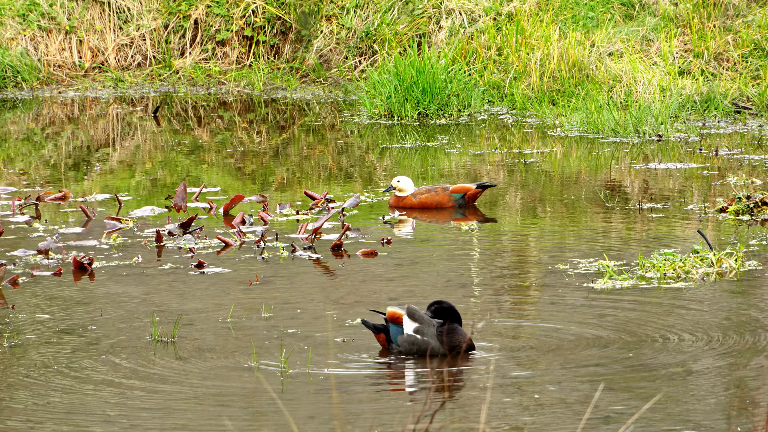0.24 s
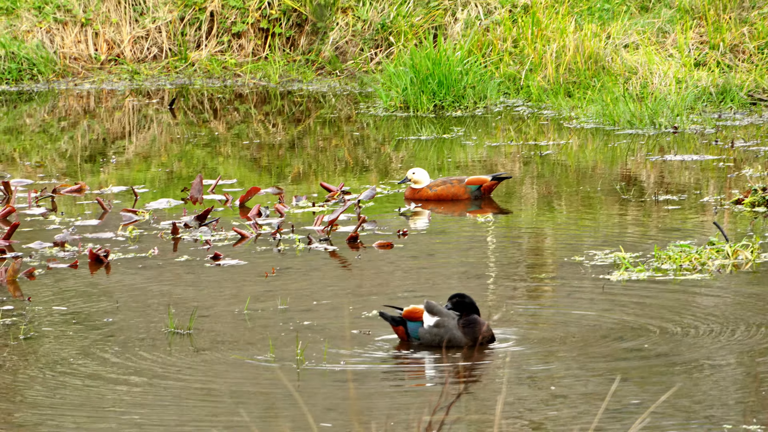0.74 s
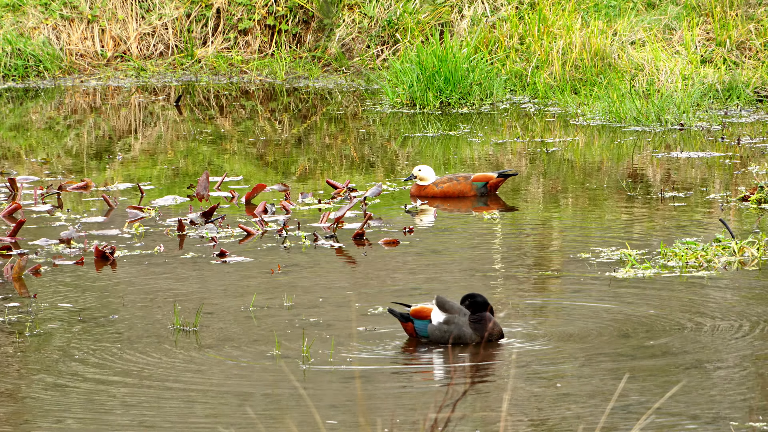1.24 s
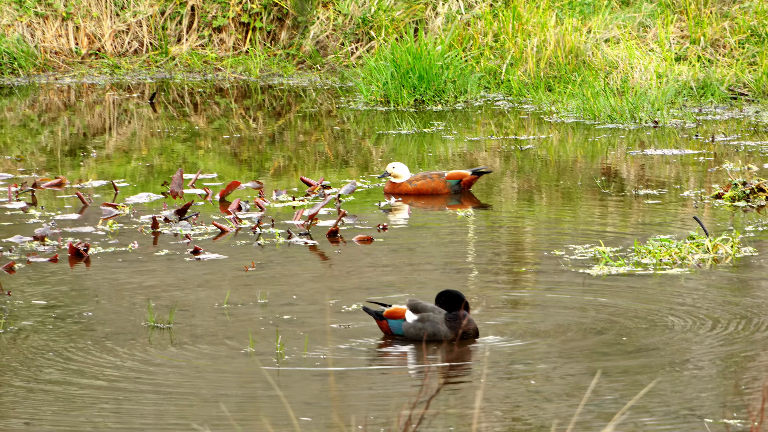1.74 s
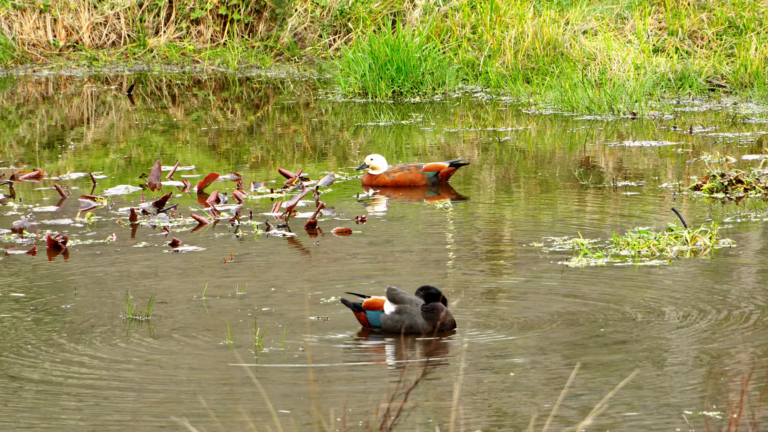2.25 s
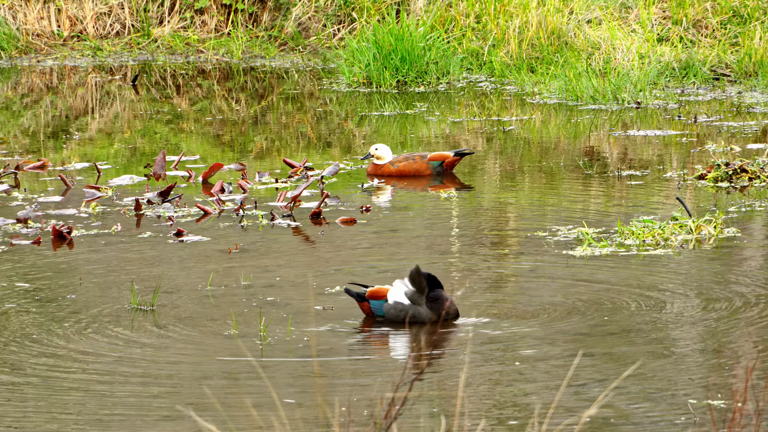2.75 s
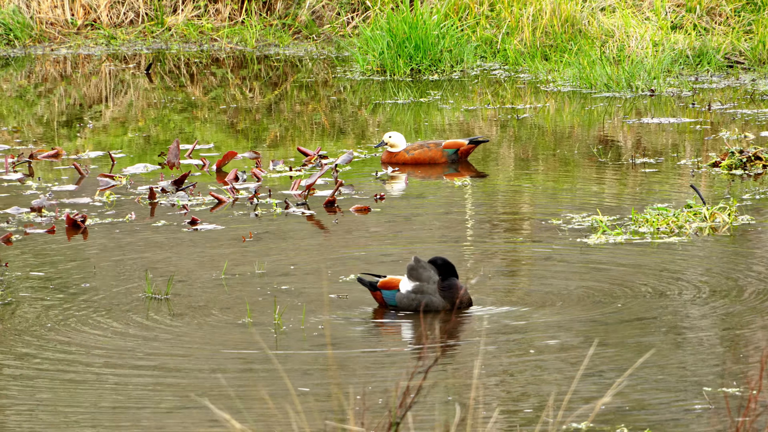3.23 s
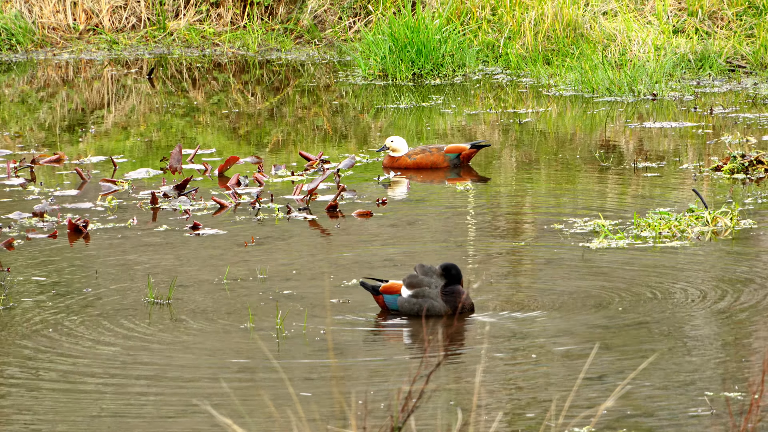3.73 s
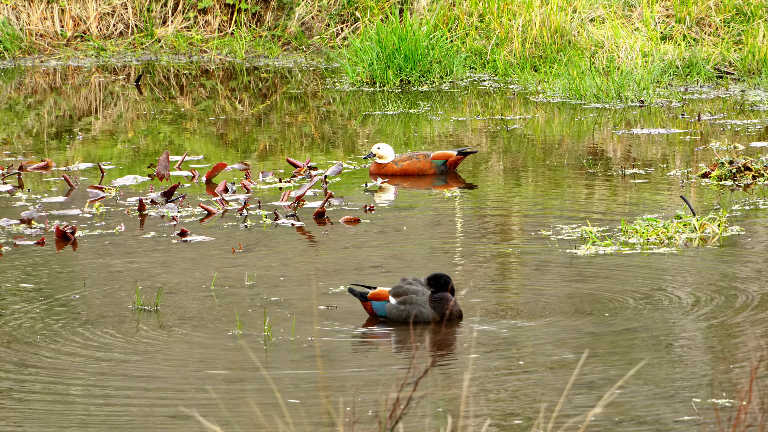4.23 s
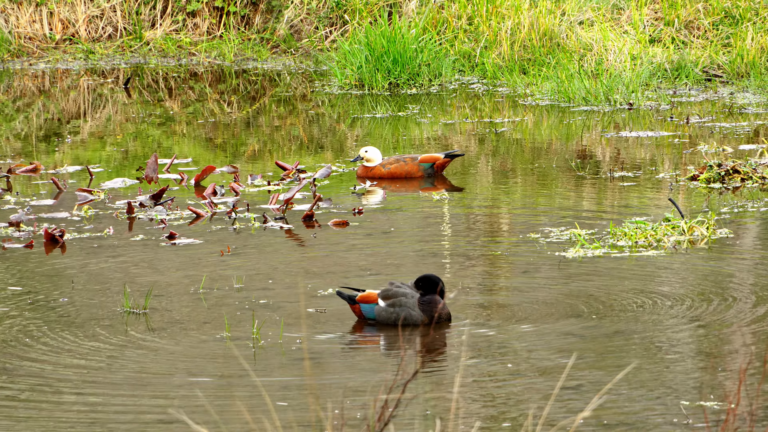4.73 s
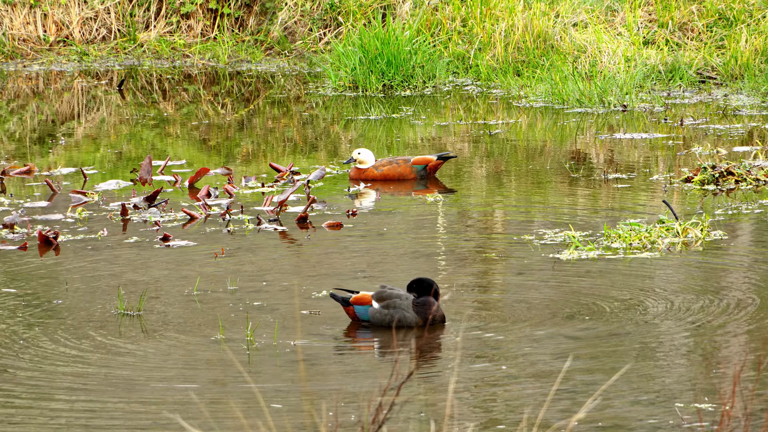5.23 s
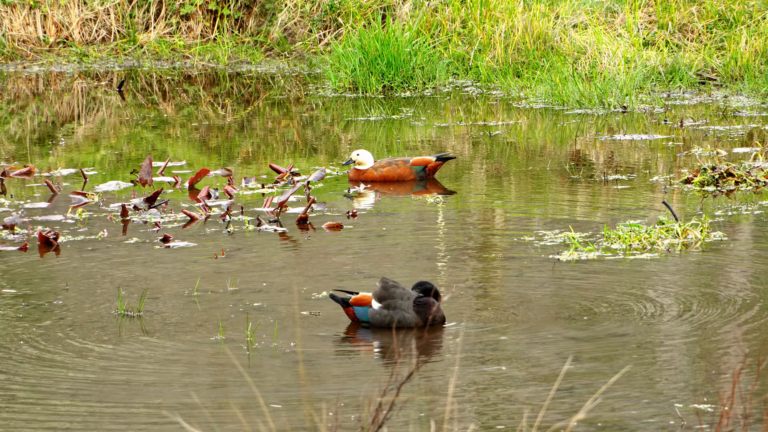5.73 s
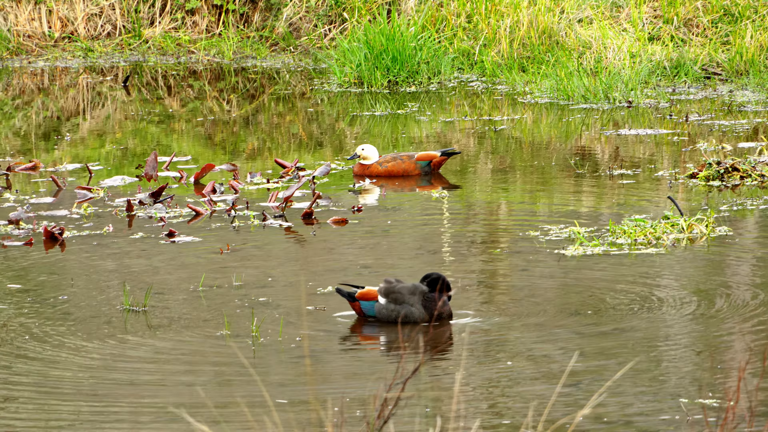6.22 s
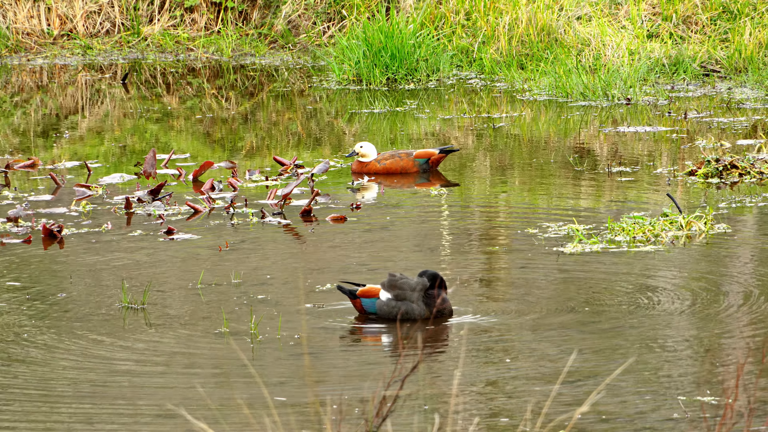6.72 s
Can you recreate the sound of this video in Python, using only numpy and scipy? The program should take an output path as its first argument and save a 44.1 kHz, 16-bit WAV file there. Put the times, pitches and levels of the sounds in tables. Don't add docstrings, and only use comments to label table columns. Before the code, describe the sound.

A quiet pond outdoors, with faint hum, steady hiss and soft low wind bumps. A brief clear whistle comes first, then faint distant warbling. Midway, a nearby bird gives a loud rising slur and rough buzzes. Varied whistles and quick chirps follow, and the rasping phrase returns at the end. A small stereo microphone catches light echoes from banks and trees; the ducks are silent.

```python
import sys
import numpy as np
from scipy import signal
from scipy.fft import rfft, irfft, next_fast_len
from scipy.io import wavfile
from scipy.ndimage import uniform_filter1d, minimum_filter1d

SR = 44100
rng = np.random.default_rng(int(sys.argv[2]) if len(sys.argv) > 2 else 0)


def file_out(sig):
    cols = np.atleast_2d(sig).T
    lim = np.clip(cols, -1, 1)
    pcm = np.round(lim * 32767).astype(np.int16)
    wavfile.write(sys.argv[1], SR, pcm)


def gain_from_db(level_db):
    decades = np.asarray(level_db, float) / 20
    return 10 ** decades


N = 307377

# start in seconds, length in seconds,
# share of the length where it peaks, peak level in dB, pitch in Hz.
PIPER_WHISTLES = [ (1.745, 0.066, 0.39, -36, 2970), (1.869, 0.11, .2, -54, 2957),
                  (4.203, 0.055, 0.67, -56, 2284), (4.8, .045, 0.51, -53, 3105),
                  (4.988, .042, 0.5, -35, 2997), (5.043, .047, .2, -37.5, 3012),
                  (5.074, 0.07, 0.78, -32.5, 3288), (5.183, 0.099, 0.45, -35.5, 2513),
                  (5.258, 0.072, 0.5, -31, 1670), (5.347, 0.099, 0.22, -54.5, 1275),
                  (5.455, 0.055, 0.51, -33, 1660), (5.508, .046, 0.74, -27.5, 1638),
                  (5.753, 0.087, 0.52, -42, 2602), (6.088, 0.048, 0.23, -37, 1558),
                  (6.128, 0.078, 0.23, -34, 1552), (6.158, 0.088, 0.24, -53, 948),
                  (6.331, 0.077, .45, -53, 947)]
# start in
# seconds, length in seconds, peak level in dB, first pitch in Hz, last pitch in Hz.
RISING_WHISTLES = [
    (4.063, 0.059, -52.5, 2970, 3200),
    (4.173, 0.049, -53.5, 1477, 1610),
    (5.656, 0.088, -43.5, 4980, 5115),
    (6.041, .055, -51, 1483, 1520),
    (6.849, 0.07, -41, 1370, 1453),
]
# start in seconds, number of throbs, throb rate in Hz, depth from 0 to 1.
PIPER_THROBS = [
    (6.142, 4, 55.7, 0.84),
    (6.855, 7, 130, 0.6),
]
# time in seconds, left over right in dB.
PIPER_HEAD = [(1.76, -8), (1.9, -11), (4.1, -2), (4.22, -15), (4.99, 3), (5.07, -2), (5.22, -9), (5.3, -3),
              (5.47, -4), (5.54, 1), (6.12, 2.5), (6.9, -4)]

# seconds after the start, pitch in Hz, level in dB,
# second partial in dB, third partial in dB.
RASPER_SLUR = [(-.03, 3360, -46, -40, -42), (-.002, 3357, -28.5, -40, -40), (.012, 3365, -4.5, -35, -39),
               (.04, 3587, -0.5, -32, -26), (.06, 4140, -1, -36, -25), (.079, 4980, -3, -28, -29)]
# start in seconds, level in dB.
RASPER_SLUR_TIMES = [
    (3.362, -27),
    (6.338, -27),
]
# buzz rate in Hz, depth from 0 to 1, pitch wobble as a share.
RASPER_SLUR_BUZZ = (185, 0.1, .013)
# syllable name, start in seconds, length in seconds, peak level in dB.
RASPER_NOTES = [("seep", 3.447, 0.108, -46), ("rattle", 3.512, .085, -33.5), ("rasp", 3.648, .066, -30.5),
                ("crest", 3.725, .09, -33), ("seep", 6.422, 0.065, -46), ("zee", 6.485, .05, -51),
                ("rattle", 6.49, 0.11, -36.5), ("rasp", 6.632, .078, -33.5), ("crest", 6.725, .08, -36),
                ("rasp", 6.856, .07, -33), ("rattle", 6.93, .06, -34)]
RASPER_SYLLABLES = {"seep": (8462, 8349, 0.4, -45, -45), "zee": (6537, 6397, .15, -40, -45),
                    "rattle": (5149.5, 5150, 1, -16.5, -18), "rasp": (4800, 5350, .38, -11, -18),
                    "crest": (5231.5, 5947, .6, -15.5, -40)}
RASPER_BUZZES = {"seep": (220, .33, 0.018), "zee": (153, .6, .012), "rattle": (82, 0.84, 0.03),
                 "rasp": (190, 0.48, 0.0357), "crest": (85, 0.92, 0.0304)}
# frequency in Hz, level in dB.
RASPER_THROAT = [(3300, 0), (4600, -6), (5700, 1.5), (6900, -5), (8400, -4.5), (10000, 1), (12500, -5),
                 (14300, 4), (15700, -4)]

# start in seconds, length in seconds, peak level in dB,
# first pitch in Hz, last pitch in Hz.
WARBLER_SLURS = [ (2.03, 0.25, -63.5, 2530, 2080), (1.97, 0.21, -67, 2950, 2660),
                 (2.15, 0.14, -61.5, 2640, 2406), (2.28, 0.14, -59.5, 2444, 2003),
                 (2.289, 0.12, -54, 2435, 2466), (2.41, .045, -60, 2940, 2920),
                 (2.43, 0.088, -56, 2630, 2480), (2.489, 0.023, -51, 3100, 3125),
                 (2.57, .1, -58.5, 2480, 2404), (2.66, .2, -55.5, 2480, 2552),
                 (2.86, 0.17, -61, 2520, 2440), (2.3, .28, -61, 2790, 3035), (2.65, .25, -67, 2890, 2740),
                 (4.45, 0.14, -63, 3100, 2880), (4.68, 0.12, -63, 2830, 2775),
                 (4.27, .2, -66.5, 2320, 2290), (4.52, .09, -58.5, 2540, 2195),
                 (4.618, 0.13, -58, 2328, 2157), (4.68, .15, -62, 2530, 2356),
                 (4.822, 0.17, -59.5, 2343, 2277), (5.35, .2, -61, 2540, 2470),
                 (5.549, 0.17, -55.5, 2600, 2560)]
# start in seconds, length in
# seconds, peak level in dB, first pitch in Hz, last pitch in Hz.
THIN_SLURS = [
    (1.5, 0.3, -72, 8040, 7700),
    (2.53, .34, -58, 8750, 6400),
    (5.62, .3, -63.5, 8440, 6200),
    (5.7, .08, -70, 6860, 6200),
    (5.72, 0.103, -63, 5160, 5300),
    (5.17, 0.065, -58.5, 1384, 1413),
]
# start in seconds, length in seconds, peak level in dB, first pitch in Hz, last pitch in Hz.
CHIRP_SLURS = [
    (5.03, 0.05, -49, 1690, 1590),
    (5.835, .037, -36, 2566, 1383),
    (6.258, 0.022, -49.5, 2560, 2350),
    (6.278, .034, -47, 1903, 1334),
    (6.608, .047, -39, 2653, 1254),
    (6.66, 0.03, -40, 2382, 1260),
    (6.708, .029, -44, 2293, 1256),
    (6.75, 0.021, -40.5, 2335, 1173),
]
# start in seconds, length in seconds, peak level in dB,
# first pitch in Hz, last pitch in Hz.
CHACK_SLURS = [
    (1.872, .035, -51, 2790, 1500),
    (4.205, .025, -54, 2987, 1845),
    (5.12, .035, -46.5, 2584, 1505),
]
# time in seconds, level in dB.
FLOCK_LEVEL = [
    (1.8, -73),
    (2.2, -58.5),
    (2.7, -55),
    (3.1, -70),
    (4.3, -70),
    (4.9, -56),
    (5.2, -58),
    (5.6, -54.5),
    (5.9, -57.5),
    (6.3, -82),
]

# frequency in Hz, left over right in dB, lead of the left port in radians.
PIPER_DIRECTION = [(1300, -3, -0.22), (1690, -1, -0.9), (3200, -0.5, -1.48), (5100, 1.5, -1.3)]
RASPER_DIRECTION = [(3460, -6.5, -2.5), (5040, 0, -3), (7400, -2, -6), (10900, -2.5, -4),
                    (15000, -14, -4.5)]
WARBLER_DIRECTION = [(2080, -19, -1.9), (2500, -11.5, -1.77), (3100, -4.5, -1.65)]
THIN_DIRECTION = [(6600, 1.5, 1.6), (8500, 1.5, 1.8)]
CHIRP_DIRECTION = [(1310, -1.9, 0.23), (2480, -2.2, -1.4)]
# frequency in Hz, time to fade by 60 dB in seconds.
BANK_ECHO = [(1000, 0.83), (2000, 0.85), (3500, 0.67), (6000, 0.62), (12000, 0.99)]

# frequency in Hz, level in dB per Hz.
GUST_COLOUR = [(8.8, -34), (15, -1), (73, -5), (119, -17), (174, -12), (236, -25), (250, -40), (320, -70),
               (550, -120)]
# time in seconds, level in dB.
BREEZE_LEVEL = [(0, -97), (.5, -88), (1.2, -99), (1.6, -92), (3.55, -89), (3.75, -100), (5.1, -91.5),
                (6.97, -92)]
# time in seconds, peak level in dB.
WIND_PUFFS = [
    (.58, -73),
    (.97, -90),
    (1.42, -75),
    (2.89, -66),
    (5.1, -84),
    (5.8, -81),
    (6.56, -89),
]

# frequency in Hz, level in dB per Hz.
HUM_COLOUR = [(60, -48), (120, -25.5), (200, -11.5), (310, -5), (500, -.5), (650, 1), (800, -3.5),
              (1200, -5), (2000, -4), (3200, -6.5), (4200, -10), (6300, -13.5), (8000, -14.5), (10500, -11),
              (15700, -9.5)]
# time in seconds, hum swell in dB, hiss swell in dB.
HUM_SWELL = [(0, 0.8, 1), (.5, 1.7, 0.4), (1.2, 0.45, -0.5), (2.5, 1.24, 0), (6, 1.35, 0), (7, 1.8, 2)]
# frequency in Hz, likeness from 0 to 1.
HUM_LIKENESS = [(60, 0.96), (240, 0.79), (950, 0.2), (3770, 0.095), (15000, 0.071)]
# frequency in Hz, left over right in dB.
HUM_LEAN = [(60, 5), (180, -1.5), (550, 0.5), (1650, 0.0), (4970, -0.5), (15000, -5)]


def piper():
    song = np.zeros((2, N))
    t = np.arange(N) / SR
    rise_db_per_s, fall_db, sag = 330, 7.5, 0.99
    whistles = []
    for start, length, peak, db, hz in PIPER_WHISTLES:
        rise_db = rise_db_per_s * peak * length
        whistles.append(arch(start, length, db, hz / sag, hz * sag, peak, rise_db, fall_db))
    for slur in RISING_WHISTLES:
        whistles.append(arch(*slur, peak=0.63, rise_db=24, fall_db=10))
    for rows in whistles:
        turn_db = np.interp(rows[:, 0].mean(), *np.transpose(PIPER_HEAD))
        sides = np.sqrt(2 / (1 + gain_from_db([-2 * turn_db, 2 * turn_db])))
        s, sound = note(rows, wobble=0.0017, flutter_db=0.9, edge=0.0044)
        add(song.T, s, sound[:, None] * sides)
    for start, throbs, throb_hz, depth in PIPER_THROBS:
        turns = np.clip(throb_hz * (t - start), 0, round(throbs))
        song *= 1 - depth * np.sin(np.pi * turns) ** 2
    return place(gain_from_db(-1.1) * song, PIPER_DIRECTION, wet_db=-8, sway=1.7)


def rasper():
    song = np.zeros(N)
    effort_db, brighten = -31.5, 0.72
    for start, db in RASPER_SLUR_TIMES:
        rows = np.add(RASPER_SLUR, [start, 0, db, 0, 0])
        add(song, *note(rows, *RASPER_SLUR_BUZZ, flutter_db=1.5))
    for name, start, length, db in RASPER_NOTES:
        from_hz, to_hz, peak, *partials_db = RASPER_SYLLABLES[name]
        rows = arch(start, length, db, from_hz, to_hz, peak, rise_db=11, fall_db=8)
        partials_db = np.add(partials_db, brighten * (db - effort_db))
        rows = np.hstack([rows, np.tile(partials_db, (len(rows), 1))])
        add(song, *note(rows, *RASPER_BUZZES[name], flutter_db=1.5))
    size = next_fast_len(N, real=True)
    throat = gain_from_db(read(RASPER_THROAT, np.fft.rfftfreq(size, 1 / SR)))
    song = irfft(rfft(song, size) * throat, size)[:N]
    return place(gain_from_db(-0.66) * song, RASPER_DIRECTION, wet_db=-.4)


def warbler():
    song = gain_from_db(-0.5) * flock()
    for slur in WARBLER_SLURS:
        rows = arch(*slur, peak=0.47, rise_db=5, fall_db=3.5)
        add(song, *note(rows, buzz_hz=30.6, depth=0.55, wobble=0.011, flutter_db=1.5))
    return place(gain_from_db(-2.5) * song, WARBLER_DIRECTION, wet_db=-3.0)


def thin_whistler():
    song = np.zeros(N)
    for slur in THIN_SLURS:
        rows = arch(*slur, peak=0.85, rise_db=9.5, fall_db=14)
        add(song, *note(rows, buzz_hz=60, depth=0.47, wobble=0.0098, flutter_db=1.0))
    return place(gain_from_db(-0.5) * song, THIN_DIRECTION, wet_db=0.0)


def chirps():
    song = np.zeros(N)
    for slurs, wobble in ((CHIRP_SLURS, .03), (CHACK_SLURS, .13)):
        for slur in slurs:
            rows = arch(*slur, peak=0.4, rise_db=7, fall_db=17.5, ease=.85)
            add(song, *note(rows, buzz_hz=156.5, depth=0.43, wobble=wobble, flutter_db=2.0, edge=0.0023))
    return place(gain_from_db(-2.2) * song, CHIRP_DIRECTION, wet_db=0.4)


def flock():
    song = np.zeros(N)
    for when, pitch, glide, size in rng.random((420, 4)):
        start = 7 * when
        end = start + 0.0509 + 0.0805 * size
        hz, db = 2000 + 1350 * pitch ** .8, 3.3 * size
        rows = [(start, hz, db), (end, hz * (.8 + .2 * glide), db)]
        add(song, *note(rows, wobble=0.035, edge=0.023))
    level_db = np.interp(np.arange(N) / SR, *np.transpose(FLOCK_LEVEL))
    return evened(song) * gain_from_db(level_db)


def arch(start, length, db, from_hz, to_hz, peak, rise_db, fall_db, ease=1.):
    u = np.arange(13) / 12
    peak = np.clip(peak, .05, .95)
    rise = rise_db * (1 - u / peak) ** 2
    fall = fall_db * ((u - peak) / (1 - peak)) ** 2
    level_db = db - np.where(u < peak, rise, fall)
    return np.transpose([start + length * u, from_hz * (to_hz / from_hz) ** u ** ease, level_db])


def note(rows, buzz_hz=100, depth=0., wobble=.003, flutter_db=0.5, edge=0.0043):
    s, *columns = np.transpose(rows)
    t = np.arange(s[0], s[-1], 1 / SR)
    hz, db, *partials_db = (uniform_filter1d(np.interp(t, s, c), size=300, mode="nearest") for c in columns)
    beats = 2 * np.pi * np.cumsum(buzz_hz * (1 + 0.143 * wander(len(t), 39.7))) / SR
    bend = wander(len(t), 351.4) + 1.28 * depth * np.sin(beats)
    turns = 2 * np.pi * np.cumsum(hz * (1 + wobble * bend)) / SR
    overtones = sum(gain_from_db(p) * np.sin(k * turns) for k, p in enumerate(partials_db, 2))
    tone = np.sin(turns) + (0.47 + 0.72 * wander(len(t), 700)) * overtones
    chop = 1 - np.clip(depth, 0, 1) * (.5 + .5 * np.cos(beats)) ** 1.4
    edges = np.clip(np.minimum(t - s[0], s[-1] - t) / edge, 0, 1)
    level = np.sqrt(2) * gain_from_db(db + flutter_db * wander(len(t), 85))
    return s[0], level * tone * evened(chop) * edges


def place(x, direction, wet_db, sway=0.42):
    size = next_fast_len(N + SR, real=True)
    hz = np.fft.rfftfreq(size, 1 / SR)
    half = gain_from_db(read(direction, hz) / 2) * np.exp(.5j * read(direction, hz, axis=2))
    ports = np.array([half, 1 / half]) / np.sqrt((abs(half) ** 2 + abs(half) ** -2) / 2)
    taps = np.zeros((2, SR))
    at = np.arange(200, SR - 20, 20)
    at = at + rng.integers(0, 20, (2, len(at)))
    np.put_along_axis(taps, at, rng.choice([-1, 1], at.shape), axis=1)
    hz, t, z = signal.stft(taps + 0.27 * taps[::-1], SR, nperseg=256)
    far = gain_from_db(-60 * t / read(BANK_ECHO, hz)[:, None])
    near = 0.42 * gain_from_db(-60 * t / 0.21)
    tail = signal.istft(z * (far + near), SR, nperseg=256)[1][:, :SR]
    tail *= gain_from_db(wet_db) / np.linalg.norm(tail[0])
    shaken = x.reshape(-1, N).mean(0) * (1 + sway * wander(N, 49)) / np.sqrt(1 + sway ** 2)
    direct = rfft(x, size) * ports
    echo = rfft(shaken, size) * rfft(tail, size) * ports ** 0.55
    return irfft(direct + echo, size)[:, :N]


def add(mix, s, sound):
    part = mix[round(s * SR):][:len(sound)]
    part += sound[:len(part)]


def wander(size, hz):
    steps = rng.standard_normal(int(2 * hz * size / SR) + 3)
    return 1.198 * np.interp(np.arange(size) * 2 * hz / SR, np.arange(len(steps)), steps)


def evened(x):
    return x / np.sqrt(np.mean(x ** 2) + 1e-20)


def read(points, hz, axis=1):
    table = np.transpose(points)
    return np.interp(np.log(hz + 1), np.log(table[0] + 1), table[axis])


def wind():
    size = next_fast_len(N, real=True)
    shared, differing = rng.standard_normal((2, size))
    noise = np.array([shared + .2 * differing, shared - .2 * differing])
    colour = gain_from_db(read(GUST_COLOUR, np.fft.rfftfreq(size, 1 / SR)))
    bumps = evened(irfft(rfft(noise) * colour, size)[:, :N])
    bumps = bumps / np.sqrt(uniform_filter1d((bumps ** 2).mean(0), size=3000) + .05)
    return bumps * gain_from_db(0.8 + wind_db())


def wind_db():
    t = np.arange(N) / SR
    rise_db_per_s, fall_db_per_s = 200, 320
    levels = [np.interp(t, *np.transpose(BREEZE_LEVEL))]
    for s, db in WIND_PUFFS:
        levels.append(db - np.where(t < s, rise_db_per_s * (s - t), fall_db_per_s * (t - s)))
    return np.max(levels, axis=0)


def countryside():
    hz = np.fft.rfftfreq(1024, 1 / SR)[:, None]
    t = np.arange(N // 256 + 5) * 256 / SR
    s, hum_db, hiss_db = np.transpose(HUM_SWELL)
    high = np.clip((hz - 2500) / 5000, 0, 1)
    swell_db = (1 - high) * np.interp(t, s, hum_db) + high * np.interp(t, s, hiss_db)
    colour_db = read(HUM_COLOUR, hz) + swell_db
    return gain_from_db(-61 + 3.5) * air(colour_db, read(HUM_LIKENESS, hz), read(HUM_LEAN, hz), patchy_db=0.9)


def air(colour_db, same, lean_db, patchy_db):
    a, b, c, d, patches = rng.standard_normal(colour_db.T.shape + (5,)).T
    patches = uniform_filter1d(patches, size=12, axis=0)
    patches = evened(uniform_filter1d(patches, size=14, axis=1))
    left = a + 1j * b
    same = np.clip(same, -1, 1)
    right = same * left + np.sqrt(1 - same ** 2) * (c + 1j * d)
    z = np.array([left * gain_from_db(lean_db / 2), right / gain_from_db(lean_db / 2)])
    z = z * gain_from_db(colour_db + patchy_db * patches)
    return evened(signal.istft(z, nperseg=1024, noverlap=768)[1][:, :N])


def scene():
    birds = piper() + rasper() + warbler() + thin_whistler() + chirps()
    return birds + wind() + countryside()


def band_limit(x):
    return signal.sosfilt(signal.butter(12, 15710, fs=SR, output="sos"), x)


def record(dry):
    hz, t, z = signal.stft(dry, SR, window="cosine", nperseg=2048, noverlap=1024)
    power = (abs(z[:, :1024]) ** 2).reshape(2, 64, 16, -1)
    bands_db = 10 * np.log10(power.mean((0, 2)) + 1e-20)
    broad_db = minimum_filter1d(bands_db, size=2, axis=0)
    below_db = np.max([np.roll(broad_db, k, axis=0) - 3.7 * k for k in range(1, 6)], axis=0)
    heard = (bands_db > below_db - 16.5) | (np.arange(64)[:, None] < 15)
    z[:, :1024] *= np.repeat(heard, 16, axis=0)
    mix = signal.istft(z, SR, window="cosine", nperseg=2048, noverlap=1024)[1][:, :N]
    return band_limit(mix)


dry = scene()
out = record(dry)
file_out(out)
```